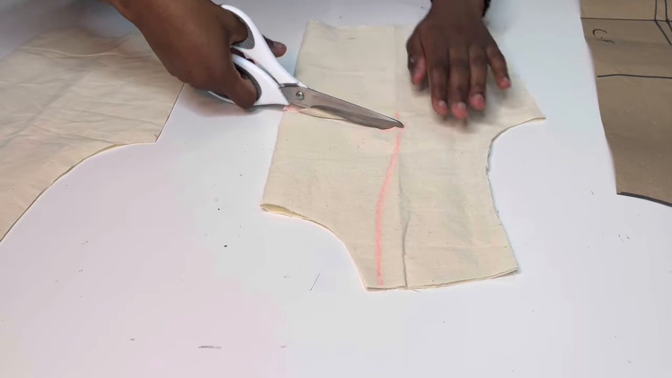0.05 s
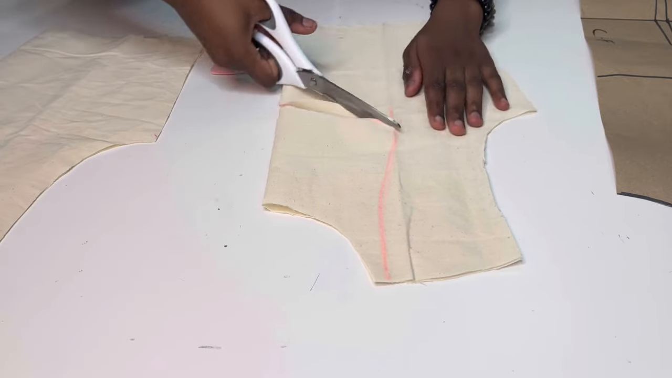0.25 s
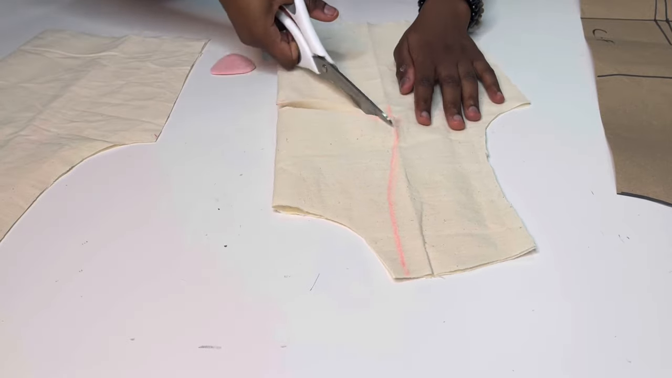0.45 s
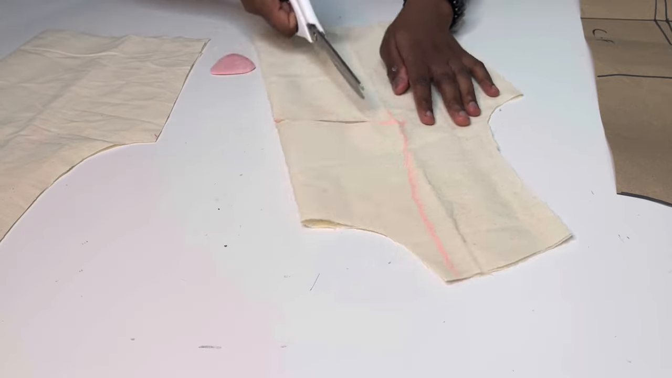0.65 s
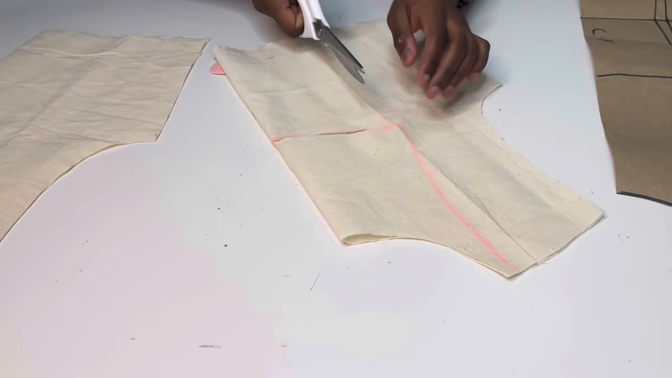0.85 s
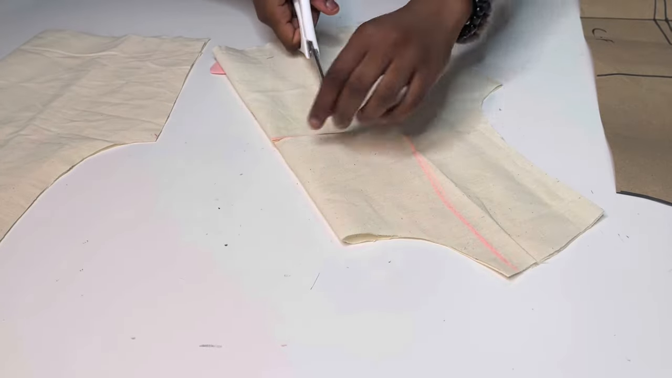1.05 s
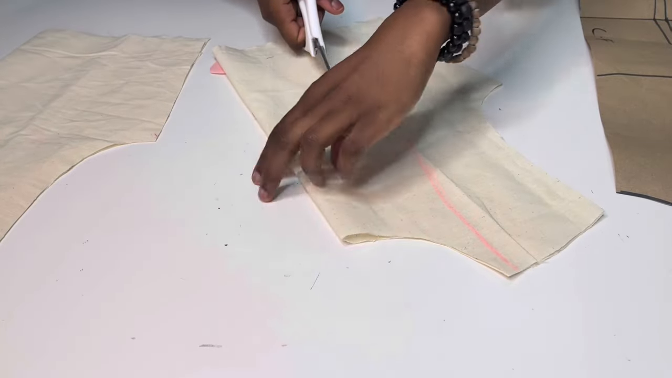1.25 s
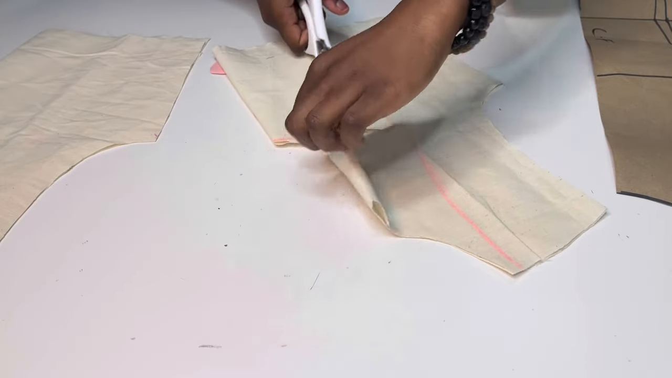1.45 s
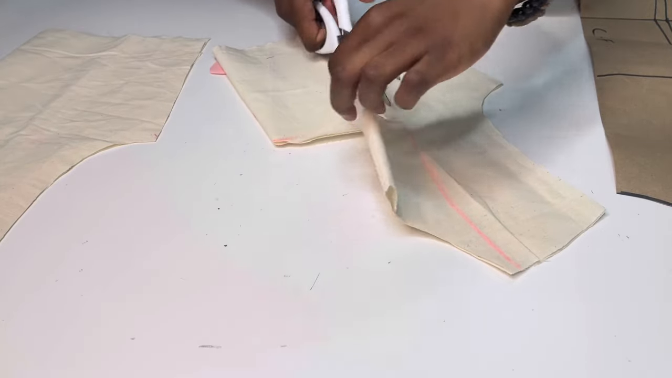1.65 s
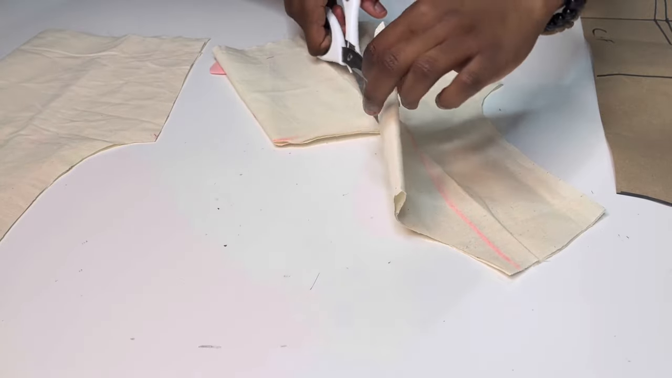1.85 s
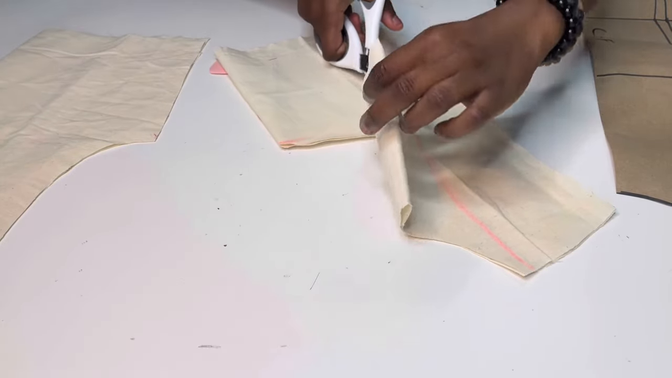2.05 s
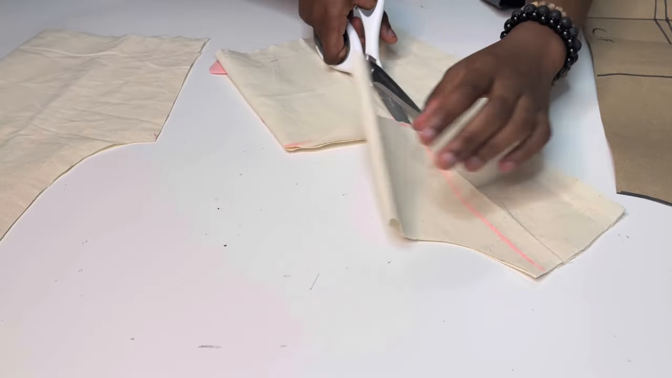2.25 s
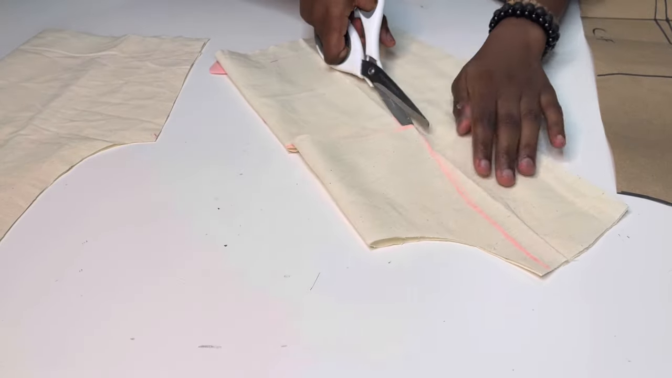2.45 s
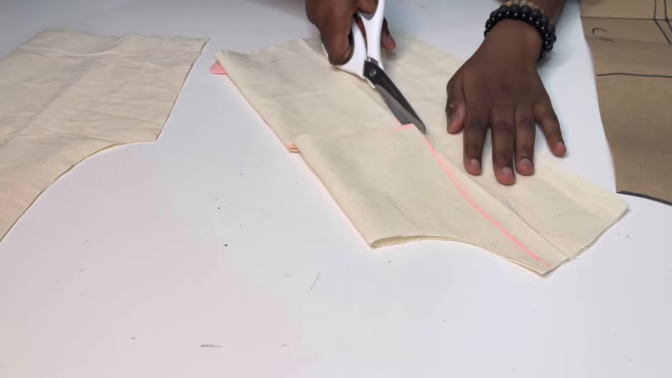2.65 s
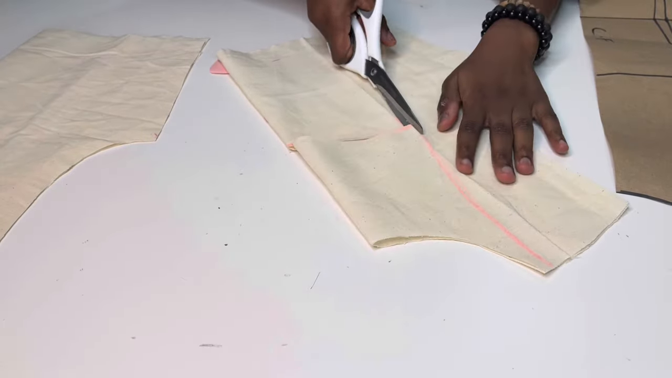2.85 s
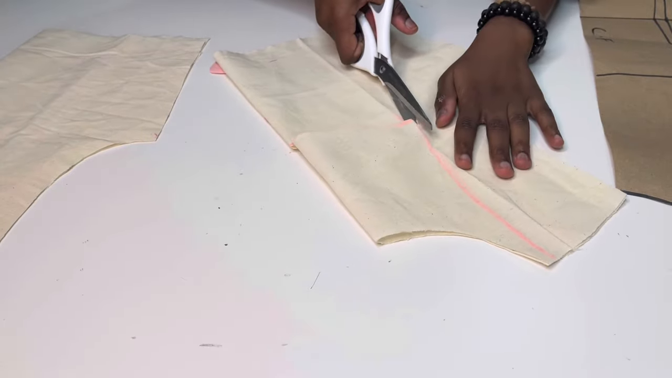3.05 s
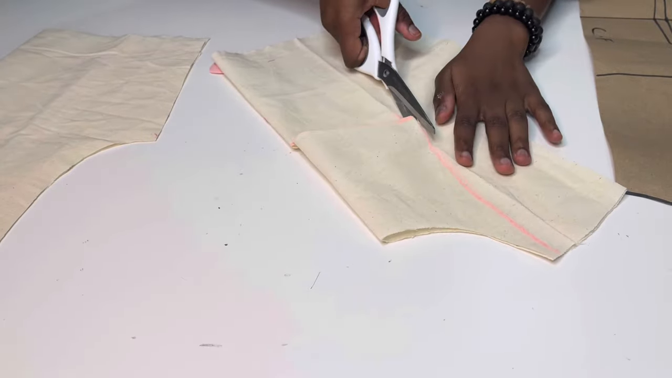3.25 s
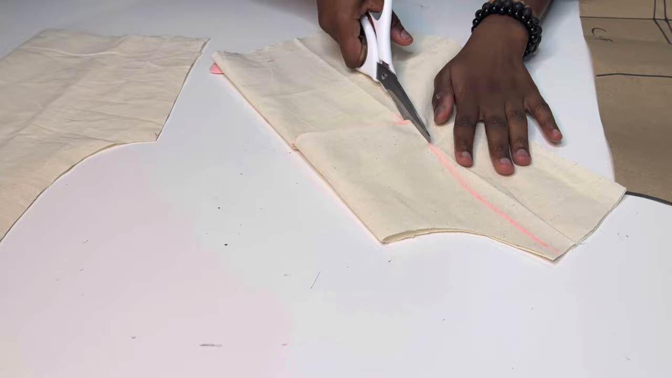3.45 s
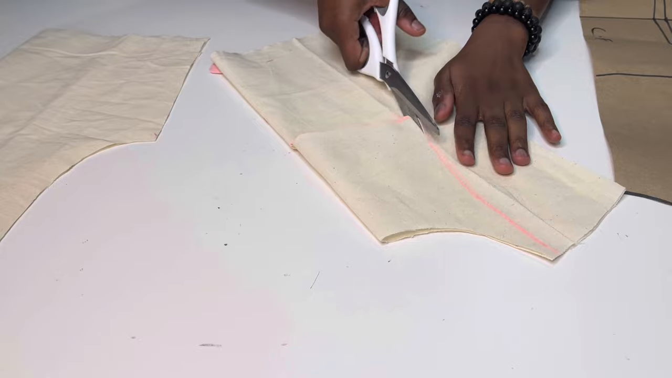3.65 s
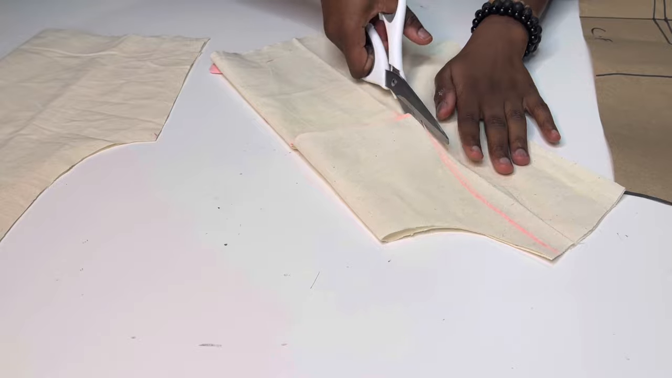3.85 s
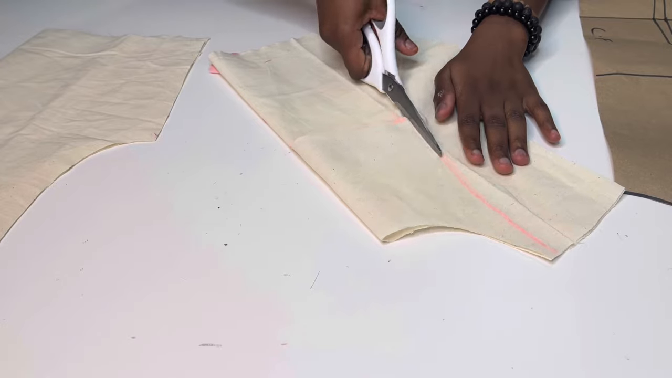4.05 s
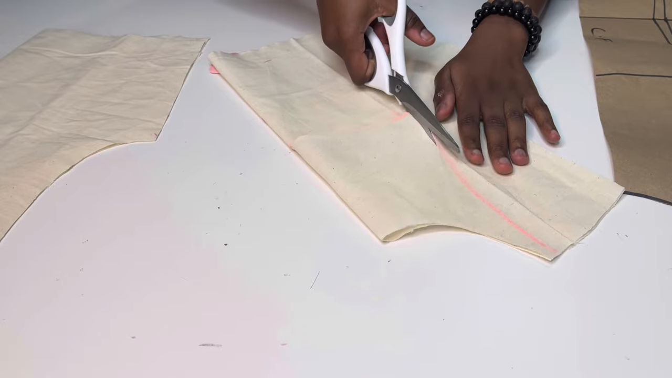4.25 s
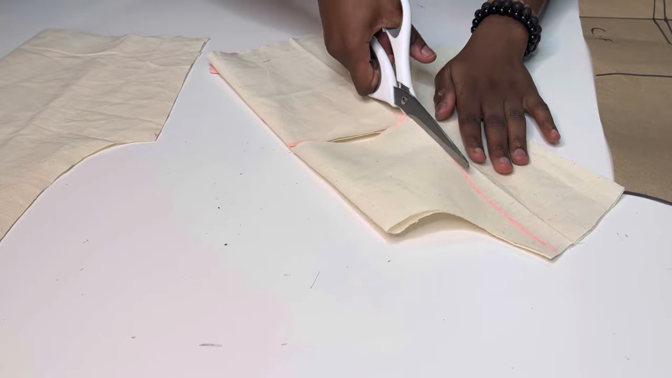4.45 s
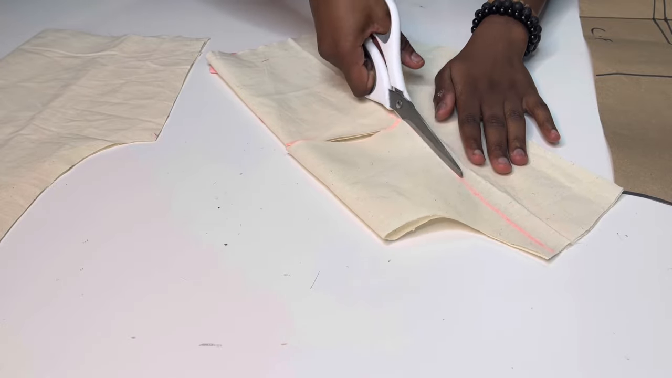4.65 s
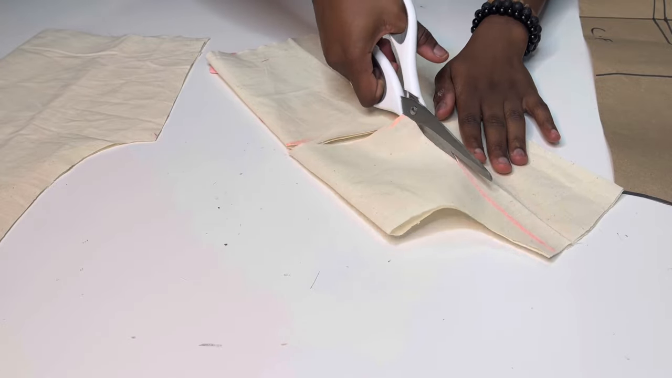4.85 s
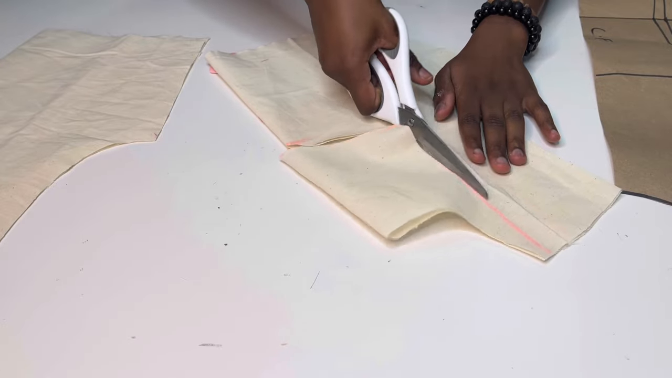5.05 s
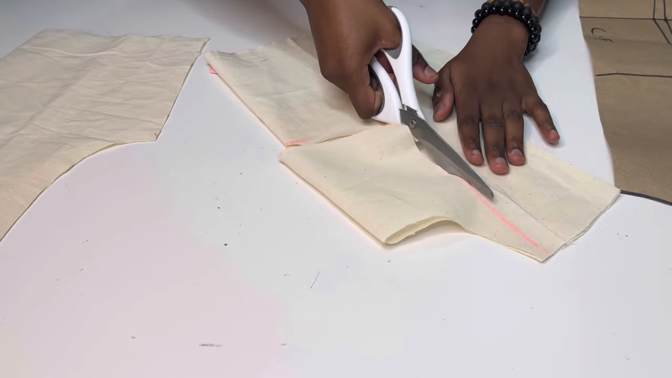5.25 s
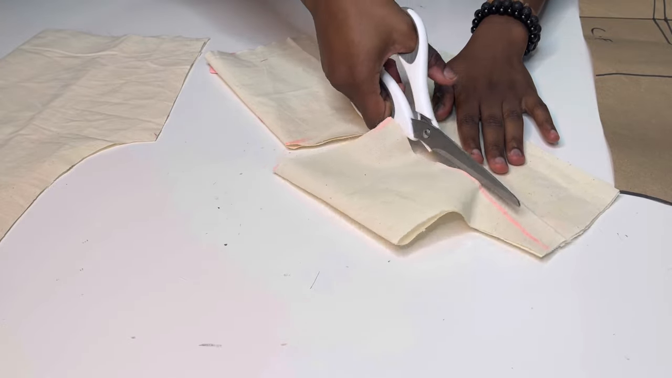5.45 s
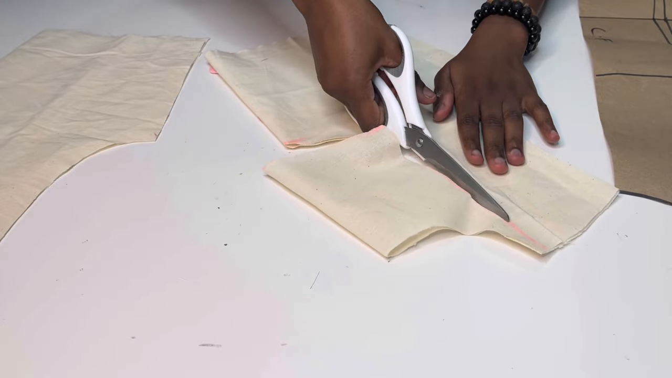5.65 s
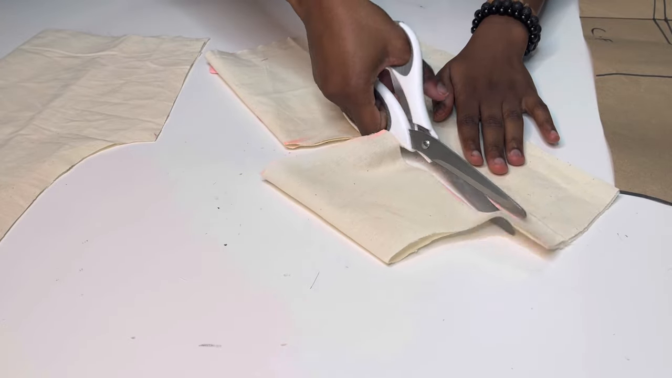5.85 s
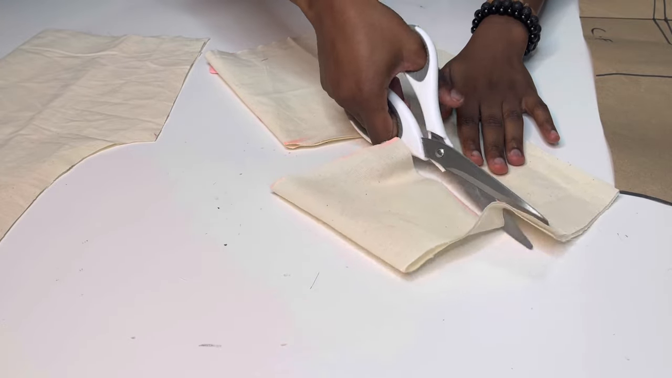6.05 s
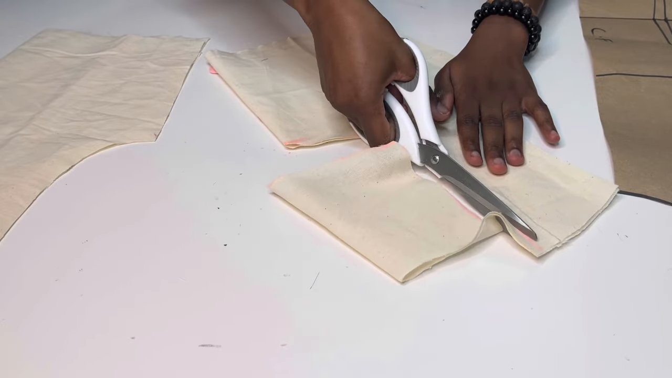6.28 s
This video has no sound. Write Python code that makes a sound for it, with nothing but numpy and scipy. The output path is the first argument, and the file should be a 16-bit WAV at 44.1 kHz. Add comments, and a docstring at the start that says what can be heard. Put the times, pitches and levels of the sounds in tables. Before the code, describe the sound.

Faint fabric rustling and bead-like ticks come first, then a cluster of metallic clacks and dull pats on cloth. After a short lull, heavy scissors cut about every half second, six times: a growing rub along the table, a crisp gritty crunch, steel rasp with thin squeak, jerky wooden knocks, then a soft reopening. Close and fairly dry, short room echoes, low hum underneath.

```python
"""Hands brush cotton cloth and small hard things tick over a low hum; scissors clack and bumps fall on the cloth.
Then large dressmaking scissors make six cuts on a table in a small room. In each cut the lower blade slides,
steel scrapes and squeaks, threads snap, and the blades jerk forward, knocking the board.
Friction is random grains under movement gains; impacts are short noisy pushes through filters and resonances.
The table's modes, the free blades' ringing and diffuse room echoes are added as impulse responses."""
import sys
import numpy as np
from scipy import signal
from scipy.fft import rfft, irfft
from scipy.io import wavfile
from scipy.ndimage import uniform_filter1d

SR = 44100
rng = np.random.default_rng(int(sys.argv[2]) if len(sys.argv) > 2 else 0)


def write(x):
    x = np.atleast_2d(x).T
    wavfile.write(sys.argv[1], SR, np.round(np.clip(x, -1, 1) * 32767).astype(np.int16))


N = 278447
T = np.arange(N) / SR

# colour of steel on steel: (frequency [Hz], relative density [dB])
STEEL_SPECTRUM = [(500, 3), (2000, -1.5), (3500, 4.5), (5200, 3), (6200, 5), (7000, 0.5), (8200, 3.5),
                  (9400, -3.5), (11500, -6.5), (13000, -21.5), (15000, -28)]
# cuts: (bite [s], slide before bite [s], edges meet before bite [s], closing [s], reopening after bite [s],
#        slide level [dB], threads level [dB], steel level [dB], squeak level [dB], hand press level [dB])
CUT_MOVES = [(3.343, 0.066, 0.016, 0.062, 0.23, -47, -34, -44.5, -74.5, -26),
             (3.931, 0.067, 0.0098, 0.094, 0.22, -37.5, -38.5, -49, -57, -30.5),
             (4.487, 0.054, 0.024, 0.095, 0.21, -34, -32.5, -48, -47, -29),
             (5.002, .043, 0.025, .102, 0.23, -35, -31, -43.5, -51, -31.5),
             (5.525, 0.033, .028, .075, .255, -37, -34.5, -45, -52.5, -28.5),
             (6.115, 0.054, 0.0029, 0.052, .23, -35, -31, -46.5, -44, -24.5)]
THREADS_SAG_DB = 8.5  # threads fade as the crossing point runs to the tips


def undb(db):
    """Decibels to amplitude gain."""
    return 10 ** (np.asarray(db) / 20)


def unit(x):
    """Scale to rms 1."""
    return x / np.sqrt(np.mean(x ** 2))


def convolve(x, response):
    """Pass a sound through an impulse response, keeping its length."""
    return signal.fftconvolve(x, response)[:len(x)]


def colour(points, size=8192):
    """Minimum-phase impulse response with the given (Hz, dB) spectrum, by folding the cepstrum."""
    hz, db = np.transpose(points)
    f = np.maximum(np.fft.rfftfreq(size, 1 / SR), 1)
    level_db = np.interp(np.log(f), np.log(hz), db)
    cepstrum = irfft(np.log(undb(level_db)))
    cepstrum[1:size // 2] *= 2
    cepstrum[size // 2 + 1:] = 0
    return irfft(np.exp(rfft(cepstrum)))


def shaped(x, points):
    """Colour a sound, keeping the power of white noise."""
    response = colour(points)
    return convolve(x, response / np.linalg.norm(response))


def walk(rate_hz):
    """Smooth random signal of rms near 1."""
    hold = max(int(SR / rate_hz), 1)
    steps = np.repeat(rng.standard_normal(N // hold + 1), hold)
    return unit(uniform_filter1d(steps, hold)[:N])


def grains(rate_hz, spread_db):
    """Random tiny clicks with an exponential spread of dB sizes; rms 1."""
    sizes = undb(spread_db * np.minimum(rng.exponential(size=N), 4))
    struck = rng.random(N) < rate_hz / SR
    return unit(struck * sizes * rng.choice([-1, 1], N))


def strokes(table, edge_s):
    """Gain of movements (start s, length s, dB, sag dB), each fading, or growing if sag < 0, while it lasts."""
    gain = np.zeros(N)
    for s, length, db, sag_db in table:
        level_db = db - np.interp(T, [s, s + length], [0, sag_db])
        inside_s = np.minimum(T - s, s + length - T)
        gain += undb(level_db) * np.clip(inside_s / edge_s + .5, 0, 1)
    return gain


def swells(table):
    """Gain of movements (loudest at s, rise s, fall s, dB); rise and fall span 20 dB, powers add."""
    power = np.zeros(N)
    for s, rise, fall, db in table:
        distance = np.maximum((s - T) / max(rise, .001), (T - s) / max(fall, .001))
        power += undb(db - 20 * distance) ** 2
    return np.sqrt(power)


def uneven(start_s, end_s, gap_s, count=16):
    """Irregular moments about one gap apart, each with a normal chance value of spread 1."""
    times = start_s + gap_s * (np.arange(count) + rng.random(count))
    return [(s, chance) for s, chance in zip(times, rng.standard_normal(count)) if s < end_s]


def contact(chatter, decay_s, size=2048):
    """One push followed by dying chatter; total energy that of rms 1 over 2 ms."""
    tail = rng.standard_normal(size) * np.exp(-T[:size] / decay_s)
    push = chatter * tail / np.linalg.norm(tail)
    push[0] += 1
    return push / np.linalg.norm(push) * np.sqrt(.002 * SR)


def filtered_hit(band, chatter, decay_s):
    """A contact heard through a filter (b, a), its energy kept."""
    click = contact(chatter, decay_s)
    sound = signal.lfilter(*band, click)
    return sound * np.linalg.norm(click) / np.linalg.norm(sound)


def add(track, s, sound):
    """Mix a short sound in at a time."""
    i = max(int(s * SR), 0)
    track[i:i + len(sound)] += sound[:max(N - i, 0)]


def ringing(modes, size=16384):
    """Impulse response of a direct impulse plus decaying (Hz, t60 s, dB) modes."""
    t = T[:size]
    response = np.zeros(size)
    response[0] = 1
    for hz, t60_s, db in modes:
        damping = np.log(1000) / t60_s
        decay = np.exp(-damping * t)
        response += undb(db) * 2 * damping / SR * decay * np.cos(2 * np.pi * hz * t)
    return response


def two_ports(mid, side, apart_hz):
    """A diffuse field at two close ports: alike in the bass, less so in the treble."""
    f = np.fft.rfftfreq(N, 1 / SR)
    share = np.clip(0.44 * f ** 2 / (f ** 2 + apart_hz ** 2) + .006, 0, 1)
    mid = irfft(rfft(mid) * np.sqrt(1 - share), N)
    side = irfft(rfft(side) * np.sqrt(share), N)
    return np.array([mid + side, mid - side])


def background():
    """A low hum of the building, narrow enough to waver, under faint hiss."""
    # both spectra: (frequency [Hz], relative density [dB])
    hum_spectrum = [(20, -41), (30, -14), (42, -11), (51, 7), (60, -6), (80, -10.5), (99, -7), (125, -14.5),
                    (170, -22), (250, -29.5), (400, -43.5), (900, -61)]
    hiss_spectrum = [(100, 4), (900, 16.5), (1500, -14.5), (2900, 17), (4500, -24), (9000, 7.5),
                     (11800, -6), (13500, -21)]

    def noise():
        """Hum and hiss from fresh white noise."""
        hum = undb(-45.5) * shaped(rng.standard_normal(N), hum_spectrum)
        hiss = undb(-82.5) * shaped(rng.standard_normal(N), hiss_spectrum)
        return hum + hiss

    return two_ports(noise(), noise(), apart_hz=700)


def room_response(first_s, size=32768):
    """Diffuse echoes that build up after the first wall, each band dying at its own rate."""
    # room bands: (frequency [Hz], t60 [s], echo level against direct [dB])
    room_bands = [(101, 0.24, 6), (235, 0.42, -0.5), (700, 0.22, -3.5), (1890, 0.28, -0.5),
                  (4860, 0.26, -6.5), (11800, 0.21, -4), (14000, .12, -8)]
    hz, t60_s, db = np.transpose(room_bands)
    t = T[:size]
    f = np.maximum(np.fft.rfftfreq(size, 1 / SR), 1)
    noise = rfft(rng.standard_normal(size))
    out = np.zeros(size)
    for k, share in enumerate(np.eye(len(hz))):
        band = irfft(noise * np.interp(np.log(f), np.log(hz), share))
        fade = undb(-60 * t / t60_s[k]) * np.clip(t / first_s - 1, 0, 1)
        out += undb(db[k]) * band * fade / np.linalg.norm(fade)
    return out


def cloth():
    """Fibres catch under the hands and on the opening blades: a fine, uneven rustle."""
    # rustle colour: (frequency [Hz], relative density [dB])
    cloth_spectrum = [(150, 6), (500, -2), (1300, -1.5), (2300, 2.5), (3300, 0.5), (5000, -9),
                      (8500, -10.5), (11500, -12), (14000, -41.5)]
    # hands stroke and fold the cloth: (loudest at [s], rise [s], fall [s], level [dB])
    brushes = [(0, .05, 0.071, -63), (.3, 0.34, 0.66, -65.5), (.69, .35, .2, -70), (1.02, 0.17, 0.5, -72),
               (1.28, 0.18, 0.23, -72.5), (1.92, 0.4, 0.8, -77), (2.21, 0.061, 0.063, -64),
               (2.56, 0.13, .55, -66), (2.98, 0.14, 1, -65.5), (3.18, 0.42, 0.073, -73)]
    # the cut cloth lifts over the opening blades
    lift_after_s, rise_s, fall_s, lift_db = 0.068, .3, 0.27, -70
    lifts = [(bite + reopen + lift_after_s, rise_s, fall_s, lift_db) for bite, _, _, _, reopen, *_ in CUT_MOVES]
    pressure = swells(brushes + lifts) * undb(1.6 * walk(30))
    return shaped(grains(rate_hz=5100, spread_db=1.0) * pressure, cloth_spectrum)


def handling():
    """Dry clacks of the scissors and dull bumps through the cloth: band-passed contacts."""
    # handles and blades clack: (time [s], level [dB], lowest [Hz], highest [Hz])
    clacks = [(0.2802, -32.5, 402, 1280), (0.761, -57, 302, 2500), (1.066, -55, 1330, 5100),
              (2.379, -36, 1350, 8950), (2.4, -46, 1490, 6900), (2.4682, -30.5, 1010, 3900),
              (2.5003, -29, 1730, 5000), (2.749, -43, 3020, 4970)]
    # hands and scissors bump softly on the cloth: (time [s], level [dB], centre [Hz])
    bumps = [(.282, -33.5, 227), (1.245, -50.5, 187), (2.425, -47, 445), (2.469, -42, 630),
             (2.58, -41.5, 330), (2.681, -42.5, 273), (2.729, -32.5, 191), (2.757, -37, 219),
             (2.965, -45, 253)]
    out = np.zeros(N)
    for s, db, low_hz, high_hz in clacks:
        band = signal.butter(2, [low_hz, high_hz], "bandpass", fs=SR)
        add(out, s, undb(db) * filtered_hit(band, chatter=2.3, decay_s=0.0025))
    # the hand's weight reaches the table after the bite
    press_after_s, press_hz = .036, 164
    presses = [(bite + press_after_s, press_db, press_hz) for bite, *_, press_db in CUT_MOVES]
    # fingers pat the fold flat
    patter_db, patter_hz = -45, 179
    patter = [(s, patter_db + chance, patter_hz) for s, chance in uneven(2.02, 2.34, gap_s=0.054)]
    for s, db, hz in bumps + presses + patter:
        band = signal.butter(3, [hz / 1.6, hz * 1.6], "bandpass", fs=SR)
        add(out, s, undb(db) * filtered_hit(band, chatter=0.8, decay_s=0.024))
    return out


def ticks():
    """Small hard contacts, each with one broad resonance."""
    # ticks of the blades, the pivot and a bead bracelet: (time [s], level [dB], centre [Hz])
    clear_ticks = [(0.092, -49, 10500), (.122, -47, 11000), (0.1255, -32, 10700), (0.7003, -49.5, 6100),
                   (.8963, -52.5, 10100), (1.0616, -43.5, 8750), (1.1979, -44.5, 11200),
                   (1.264, -48.5, 8200), (2.3425, -58, 10100), (2.456, -40.5, 10700), (2.6768, -48.5, 6700),
                   (2.719, -41.5, 7200), (2.749, -41.5, 7800)]
    # spans of fainter chance ticks as hands move: (start [s], end [s], mean level [dB], centre [Hz])
    rattles = [(0.027, .15, -57, 10100), (0.731, .89, -60, 9000), (1.08, 1.23, -54.5, 9200),
               (2.688, 2.77, -39, 7360)]
    # gain over all ticks: (frequency [Hz], gain [dB])
    tick_spectrum = [(1000, -24), (3000, -5), (6000, -5.5), (8500, 1), (11700, 2.5), (13000, -7),
                     (14500, -15)]
    gap_s, scatter_db = .045, 4
    faint = []
    for start, end, db, hz in rattles:
        faint += [(s, db + scatter_db * chance, hz) for s, chance in uneven(start, end, gap_s)]
    out = np.zeros(N)
    for s, db, hz in clear_ticks + faint:
        band = signal.iirpeak(min(hz, .4 * SR), 2.2, fs=SR)
        add(out, s, undb(db) * filtered_hit(band, chatter=0.68, decay_s=0.0033))
    return convolve(out, colour(tick_spectrum))


def table_top(force):
    """Bending waves carry the treble first; the board gives a dead thud and rings briefly in its modes."""
    # table and scissors ring together: (frequency [Hz], t60 [s], level against the dead thud [dB])
    table_modes = [(146.4, 0.19, 2.5), (189.7, 0.3, -2), (234.1, 0.15, 8.5), (391.7, 0.11, -19.5),
                   (448, 0.16, -13.5), (494, 0.13, -10), (750, 0.36, -8), (893, 0.42, -3.5),
                   (955, 0.11, -2), (1077, 0.15, -4), (1230, 0.07, -10), (1445, .12, -2), (1694, 0.077, 0),
                   (1835, 0.33, 0.5), (1950, 0.057, -4.5), (2085, 0.035, -9), (2420, 0.036, -9.5),
                   (2920, .06, -5.5), (3440, 0.014, -3), (3830, .06, -18)]
    response = ringing(table_modes)
    for pole in (.6, .75, .85):  # all-passes delay the bass
        response = signal.lfilter([-pole, 1], [1, -pole], response)
    return undb(-1.5) * convolve(force, response)


def blades(force, shift_db):
    """The crossing point runs along the edges, so each resonance comes and goes by itself."""
    # broad blade resonances, each filtered twice: (frequency [Hz], width per pass [Hz], relative level [dB])
    resonances = [(2240, 1300, 4), (3280, 1300, -5.5), (4785, 300, -6.5), (6060, 3000, -14),
                  (8140, 2800, -2), (9120, 300, -8), (11350, 2160, 3), (12450, 700, -5.5)]
    out = np.zeros(N)
    for hz, width_hz, db in resonances:
        band = signal.iirpeak(hz, hz / width_hz, fs=SR)
        ring = signal.lfilter(*band, force * undb(shift_db * walk(130)))
        ring = signal.lfilter(*band, ring)
        out += undb(db - 9.5) * ring * np.sqrt(SR / width_hz / 2)
    return out


def cut_gains():
    """Every cut slides in, closes and reopens; gives the gains of threads, table rub, steel and squeak."""
    slide_swell_db = 12  # the slide grows towards the bite
    reopen_s, reopen_db, reopen_sag_db = .18, -45.5, 16.5  # the lower blade drags as the scissors open
    pivot_after_s, pivot_db = 0.052, -72  # the unloaded edges whisper past each other
    steel_sag_db = -1  # steel grows slightly
    squeak_s, squeak_sag_db = 0.041, 4.5
    shear, slide, drag, scrape, squeak = [], [], [], [], []
    for bite, lead, meet, closing, reopen, slide_db, threads_db, steel_db, squeak_db, _ in CUT_MOVES:
        shear.append((bite, closing, threads_db, THREADS_SAG_DB))
        slide.append((bite - lead, lead, slide_db - slide_swell_db, -slide_swell_db))
        drag.append((bite + reopen, reopen_s, reopen_db, reopen_sag_db))
        scrape.append((bite - meet, meet + closing, steel_db, steel_sag_db))
        scrape.append((bite + reopen + pivot_after_s, reopen_s, pivot_db, steel_sag_db))
        squeak.append((bite - meet, squeak_s, squeak_db, squeak_sag_db))
    rub = strokes(slide, edge_s=.022) + strokes(drag, edge_s=0.012)
    return strokes(shear, edge_s=.004), rub, strokes(scrape, edge_s=.0041), strokes(squeak, edge_s=.006)


def catches(count=3):
    """The opening blade sticks and slips on the board: dull pushes, each softer than the last."""
    after_s, gap_s, first_db, fade_db = 0.00201, 0.031, -34, 1.5
    pushes = np.zeros(N)
    for bite, _, _, _, reopen, *_ in CUT_MOVES:
        for k in range(count):
            push = undb(first_db - k * fade_db) * contact(chatter=1.2, decay_s=.004)
            add(pushes, bite + reopen + after_s + k * gap_s, push)
    return pushes


def cutting():
    """Threads snap, the lower blade rubs the board in small slips, and the edges grind and squeak."""
    # both spectra: (frequency [Hz], relative density [dB])
    threads_spectrum = [(90, -21), (160, 2), (300, 6.5), (900, 8), (1350, -3.5), (2100, -7.5),
                        (3200, -19.5), (5000, -15), (12000, -20.5)]
    rub_spectrum = [(85, -17), (160, -0.5), (250, 0), (400, 6), (900, -4.5), (1400, -12.5), (2100, -14.5),
                    (3200, -32.5), (6000, -36), (13000, -46.5)]
    # scissors and cloth are shifted on the table: (start [s], length [s], level [dB])
    table_shifts = [(0, 0.027, -57.5), (0.756, 0.039, -57.5), (2.55, 0.172, -58.5), (2.719, 0.077, -48.5),
                    (2.953, 0.13, -54)]
    # single scrapes of steel on steel: (loudest at [s], rise [s], fall [s], level [dB])
    single_scrapes = [(.7, 0.19, 0.11, -62), (2.385, 0.015, 0.16, -53), (2.75, 0.096, 0.091, -56),
                      (5.275, 0.009, 0.053, -41.5), (5.588, 0.0082, .004, -24)]
    shear, slide, scrape, squeak = cut_gains()
    shift_sag_db = 10
    shifts = strokes([(s, length, db, shift_sag_db) for s, length, db in table_shifts], edge_s=0.0061)
    threads = shaped(grains(rate_hz=900, spread_db=3.0) * shear, threads_spectrum)

    slips = grains(rate_hz=1200, spread_db=1.5) * undb(4.5 * walk(90)) * (slide + shifts)
    rub = shaped(slips + catches(), rub_spectrum)

    grind = grains(rate_hz=5500, spread_db=0.5) * undb(2.76 * walk(120))
    grind = grind * (scrape + swells(single_scrapes))
    steel = undb(-2.5) * blades(grind, shift_db=4.5) + undb(-3.5) * shaped(grind, STEEL_SPECTRUM)

    squeak_hz, width_hz = 11750, 1100
    band = signal.butter(2, [squeak_hz - width_hz / 2, squeak_hz + width_hz / 2], "bandpass", fs=SR)
    squeal = unit(signal.lfilter(*band, rng.standard_normal(N)))
    squeal = squeal * undb(2.6 * walk(100)) * squeak
    return table_top(threads + rub) + steel + squeal


def jerks():
    """Small stick-slip jerks while the blades close: rows of (s, thud dB, crack dB)."""
    gap_s, scatter_db = .015, 2.5
    thud_above_threads_db, crack_db = 5, -37.5
    rows = []
    for bite, _, _, closing, _, _, threads_db, *_ in CUT_MOVES:
        for s, chance in uneven(bite, bite + closing, gap_s):
            load_db = threads_db - THREADS_SAG_DB * (s - bite) / closing
            thud_db = load_db + thud_above_threads_db
            rows.append((s, thud_db + scatter_db * chance, crack_db + scatter_db * chance))
    return rows


def knocks():
    """Each jerk cracks in the steel first and loads the table a moment later."""
    # blades land or jerk hard through the cloth: (time [s], thud level [dB], steel crack level [dB])
    hard_knocks = [(.2799, -28, -40.5), (3.3433, -19.5, -21), (3.3874, -27, -29), (3.931, -21.5, -52),
                   (3.947, -18, -41), (3.9589, -13.5, -24.5), (3.977, -19.5, -27.5), (4.0128, -21, -28),
                   (4.4713, -33, -44), (4.4905, -21, -31), (4.5149, -16, -44), (4.5264, -19, -26.5),
                   (4.556, -26, -29.5), (4.5816, -32, -37.5), (5.0029, -24, -45), (5.0107, -22.5, -47),
                   (5.0266, -14, -26), (5.067, -24, -33), (5.0914, -27.5, -27.5), (5.5857, -8.5, -15.5),
                   (5.6211, -25, -29), (6.1164, -27, -43.5), (6.1285, -22.5, -36), (6.141, -17, -26.5),
                   (6.1647, -16, -28.5)]
    # thud colour: (frequency [Hz], relative density [dB])
    thud_spectrum = [(50, -28.5), (105, -12), (250, -5), (600, -3.5), (950, -2), (1350, -6.5), (2100, -4),
                     (3000, -11.5), (4500, -20), (7000, -35), (13000, -40)]
    thuds, cracks = np.zeros(N), np.zeros(N)
    for s, thud_db, crack_db in hard_knocks + jerks():
        add(thuds, s + 0.00032, undb(thud_db) * contact(chatter=1.24, decay_s=0.0054))
        add(cracks, s - .0003, undb(crack_db) * contact(chatter=2.6, decay_s=0.002))
    board = table_top(shaped(thuds, thud_spectrum))
    steel = undb(-2.5) * shaped(cracks, STEEL_SPECTRUM) + undb(-6) * blades(cracks, shift_db=6)
    return board + steel


def scene(left_over_right_db=1.4):
    """Cloth, handling, ticks and cuts with room echoes over the hum, all slightly louder on the left."""
    # free blades ring at clacks, bumps and ticks: (frequency [Hz], t60 [s], level against the dry hit [dB])
    blade_modes = [(2080, 0.092, 3), (2885, 0.12, -4), (3410, 0.073, 8.5), (4016, .15, 6.5),
                   (4920, 0.17, 0)]
    hits = convolve(handling() + ticks(), ringing(blade_modes))
    near = cloth() + hits + cutting() + knocks()
    mid, side = (convolve(near, room_response(first_s=0.0024)) for _ in range(2))
    echoes = two_ports(mid, side, apart_hz=477)
    balance_db = np.array([[left_over_right_db], [-left_over_right_db]]) / 2
    return (near + echoes + background()) * undb(balance_db)


def record(dry):
    """The ports differ in phase; the microphone has a narrow dip in the treble and a steep top edge."""
    # port phase: (frequency [Hz], lead of the left [rad])
    port_phase = [(0, 0), (1900, -.25), (2700, .7), (5500, .6), (6900, .1), (7600, .8), (8800, -.2),
                  (9700, -2.5), (10600, -3.6), (11300, -5), (11800, -6.2), (12500, -6.5), (13300, -9.2)]
    # both responses: (frequency [Hz], gain [dB])
    microphone = [(20, 1.5), (9300, -3.5), (10200, -6), (11100, 2.5), (12300, -11), (14000, -14)]
    right_port = [(4500, 0), (8000, 0), (12000, 1)]
    lag_rad = np.interp(np.fft.rfftfreq(N, 1 / SR), *np.transpose(port_phase))
    right = irfft(rfft(dry[1]) * np.exp(-1j * lag_rad), N)
    right = convolve(right, colour(right_port))
    response = colour(microphone)
    heard = np.array([convolve(dry[0], response), convolve(right, response)])
    top_hz = 15500
    return signal.sosfilt(signal.ellip(8, .2, 70, top_hz, fs=SR, output="sos"), heard)


dry = scene()
out = record(dry)
write(out)
```